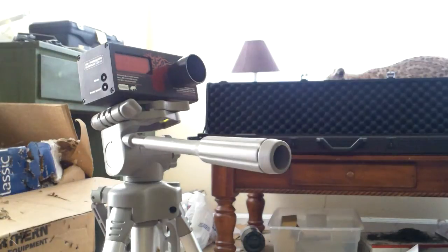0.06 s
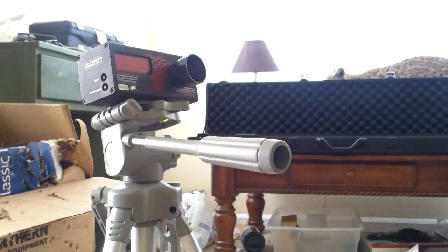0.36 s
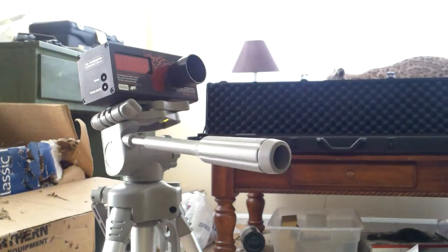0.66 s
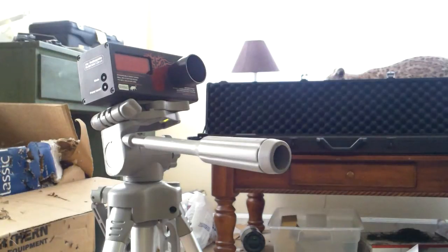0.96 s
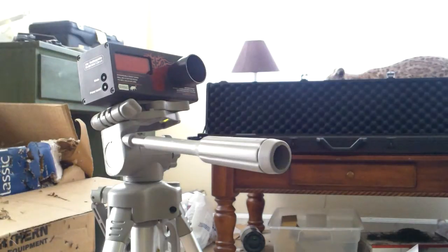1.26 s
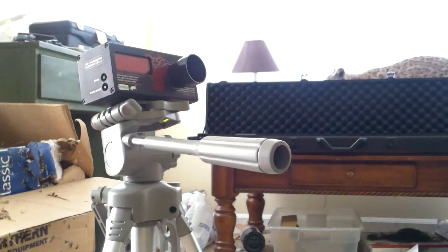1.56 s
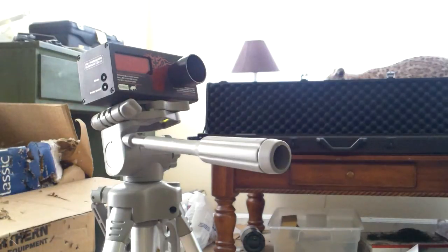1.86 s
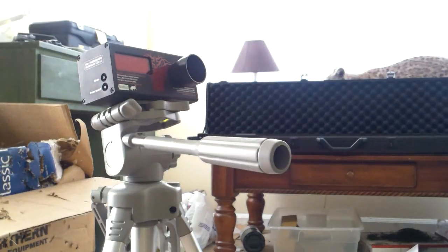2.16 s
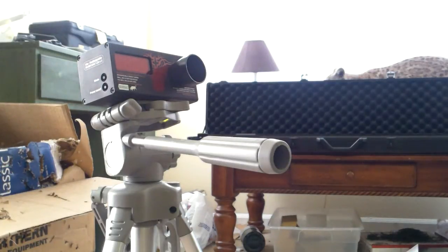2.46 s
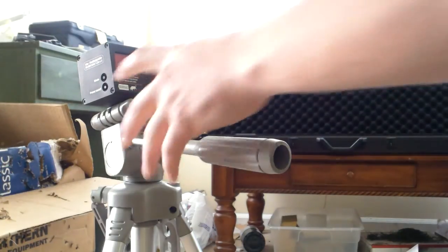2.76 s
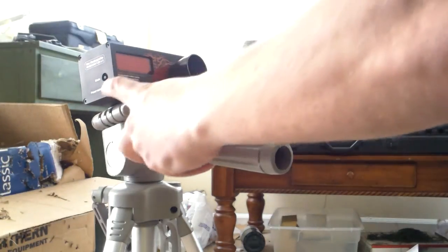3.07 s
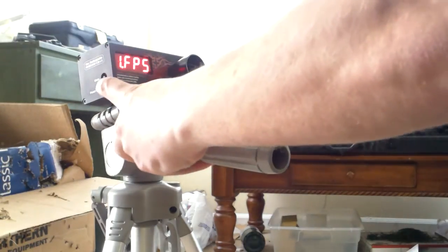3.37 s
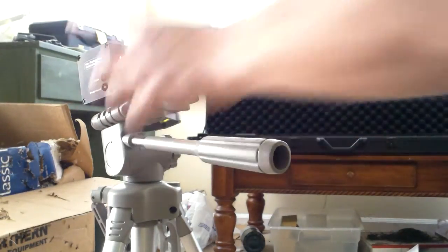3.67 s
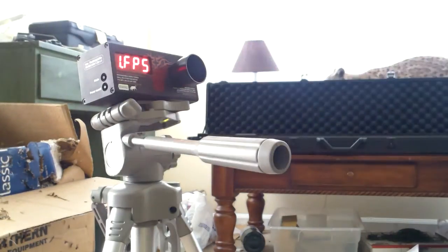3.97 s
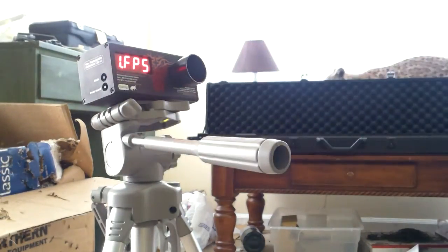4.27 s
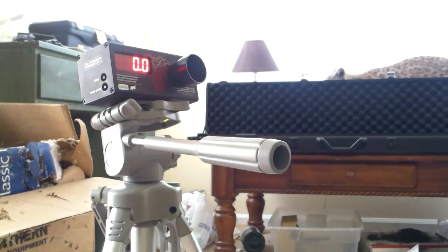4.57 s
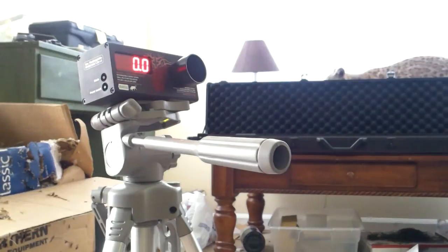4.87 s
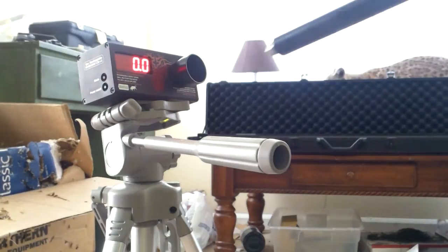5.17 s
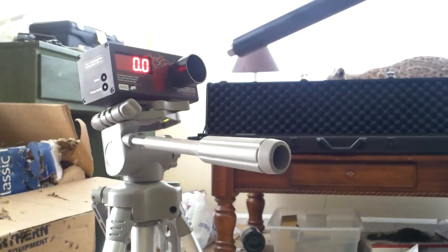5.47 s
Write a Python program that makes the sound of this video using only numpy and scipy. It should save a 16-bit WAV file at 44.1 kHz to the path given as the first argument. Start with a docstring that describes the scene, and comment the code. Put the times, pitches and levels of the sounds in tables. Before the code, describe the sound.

In a small furnished room, an airsoft rifle is loaded with sharp metallic snaps and a brief spring ping. The stock creaks softly, then the bolt clacks back and locks shut. Afterwards come faint sleeve rustles, a small button click and a few hollow plastic knocks as the rifle is lifted. The microphone is close, with a faint hum and low rumble underneath.

```python
"""Airsoft rifle, loaded and cocked.

In a small furnished room, parts snap home, a spring pings, the stock creaks, the bolt slides and locks.
Sleeves rustle, a button clicks and the hollow plastic stock knocks as the rifle is lifted.
Underneath: mains hum, a thin electronic whine, floor rumble. Gain control ducks after the hardest snaps."""
import sys
import numpy as np
from scipy import signal
from scipy.fft import rfft, irfft
from scipy.io import wavfile
from scipy.ndimage import uniform_filter1d

SR = 44100
rng = np.random.default_rng(int(sys.argv[2]) if len(sys.argv) > 2 else 0)


def log_audio(samples):
    """Write samples as a 16-bit WAV file to the path given in sys.argv[1]."""
    # one column per channel
    frames = np.atleast_2d(samples).T
    # limit to full scale, then quantise
    limited = np.clip(frames, -1, 1)
    pcm = np.round(limited * 32767).astype(np.int16)
    wavfile.write(sys.argv[1], SR, pcm)


N = 251811
TIME_S = np.arange(N) / SR

# mains and motor tones: pitch_hz, rms_db, wander_ratio
HUM_TONES = [(120.1, -55, 0.0079), (222.6, -64, 0.0077)]
# noise spectra: freq_hz, relative_db
FLOOR_SPECTRUM = [(20, -11), (40, -5.5), (65, -2), (100, -2), (140, -15), (300, -23.5), (1000, -53)]
AIR_SPECTRUM = [(10, -10.5), (25, 4.5), (38, -1.5), (65, -3.5), (105, -4.5), (145, -16), (200, -16.5),
                (290, -15.5), (450, -16), (1000, -26), (2000, -29.5), (5000, -32.5), (10500, -34.5),
                (16000, -39.5)]
CLOTH_SPECTRUM = [(200, 7.5), (600, 5), (1500, -3), (3000, -6), (6000, -8), (8500, -8), (10500, -13),
                  (13000, -12), (16000, -14)]
HISS_SPECTRUM = [(100, -2.5), (1000, 5.5), (4000, -0.5), (9000, -4.5), (16000, -3)]
# metal contacts in the action: start_s, level_db, chatter_ms, size_cm, contact_us
METAL_CONTACTS = [ (.2233, -1, 8.5, 74, 123), (.2361, 21.5, 1.6, 23, 90), (.2927, 11, 3, 25, 160),
                  (.3066, 16.5, 0.51, 1.8, 31), (.5185, -8, 2.6, 20, 470), (1.0473, 0, 3.4, 2.86, 29),
                  (1.1924, 7.5, 2.2, 4.1, 78), (1.2152, -4, 7.5, 16, 24), (1.2234, -1, 11, 32, 180),
                  (1.2317, 16.5, 3.6, 5.1, 57), (1.2340, 16, 0.59, 9.4, 150), (1.5942, 7, 2, 4.2, 166),
                  (1.6076, 4, 4.4, 4.8, 45), (1.6210, 11, 7.6, 12.7, 76), (1.6280, 6, 3.2, 16, 30),
                  (1.6430, 3.5, 17, 40, 25), (1.6574, 19.5, 2.2, 3, 44)]
# taps on hollow plastic: start_s, level_db, chatter_ms, size_cm, contact_us
PLASTIC_TAPS = [ (1.953, -22, 11, 12, 300), (2.546, -16.5, 1.2, 22, 153), (3.059, -14.5, 2.9, 11, 280),
                (3.434, -15, 1.2, 3.9, 22), (4.014, -15, 1.5, 7.5, 102), (4.050, -15.5, 16, 44, 320),
                (4.160, -9.5, 4.5, 29, 203), (4.197, -12, 1.1, 7.3, 115), (4.352, -9, 4, 22, 380),
                (4.360, -3, 4.6, 47, 88), (4.3622, -2, 0.96, 29, 71), (4.653, -10.5, 6, 25, 260)]
# contact colour: freq_hz, gain_db
METAL_COLOUR = [(150, 5.5), (300, -4.5), (500, -6), (800, 4), (1150, 2.5), (1500, 1), (1900, 6),
                (2600, 4.5), (3300, 2), (4200, 4.5), (5300, 0), (6500, 2.5), (8700, -1), (12500, -1.5),
                (15500, -2.5)]
PLASTIC_COLOUR = [(200, -9), (500, -1), (800, 9), (1150, -1), (1800, 5.5), (3000, 4.5), (4000, 1.5),
                  (6000, 3.5), (8700, -4.5), (10500, -3.5), (15500, -9)]
# ringing modes: pitch_hz, gain_db, t60_s
RECEIVER_MODES = [(1720, -62, 0.073), (1897, -76, .45), (4200, -64, 0.19), (4650, -40, 0.044)]
SHELL_MODES = [(874, -59, 0.041), (1800, -56, 0.074), (2970, -38, .03)]
SEAR_MODES = [(4170, -19.5, 0.35)]
BARREL_MODES = [(654, -23.5, 0.05), (901, -14, 0.14), (1870, -40, 0.93), (6200, -2, 0.028)]
# crowded spring modes: centre_hz, spread_hz, gain_db, t60_s
MAIN_SPRING_BANDS = [(5500, 1700, -51.5, 0.37), (10420, 780, -39.5, 0.14)]
CATCH_SPRING_BANDS = [(5940, 64.3, -10, .08), (6600, 130, 0.5, 0.052), (9540, 75, -8, 0.1),
                      (11900, 350, 2, .04)]
# arm movements brushing the sleeves: peak_s, length_s, level_db
ARM_STROKES = [(2.174, 0.17, -60.5), (2.476, 0.22, -54.5), (2.68, 0.28, -60), (3.746, 0.14, -58.5),
               (4.382, 0.25, -58), (4.663, 0.14, -54), (4.968, 0.25, -61.5)]
# room decay: freq_hz, t60_s
ROOM_DECAY = [(200, 0.4), (800, 0.31), (2500, 0.34), (6000, 0.29), (10000, 0.24), (15000, 0.17)]


def from_db(db):
    """Decibels to gain."""
    return 10 ** (np.asarray(db) / 20)


def unit_rms(x):
    """Scale to rms 1."""
    return x / np.sqrt(np.mean(x ** 2) + 1e-20)


def at_hz(points, hz):
    """Interpolate a spectrum over log frequency."""
    points = np.array(points)
    return np.interp(np.log(np.maximum(hz, 1)), np.log(points[:, 0]), points[:, 1])


def noise(spectrum):
    """Steady coloured noise, rms 1."""
    hz = np.arange(N // 2 + 1) * SR / N
    return unit_rms(irfft(rfft(rng.standard_normal(N)) * from_db(at_hz(spectrum, hz)), N))


def drift(rate_hz):
    """Slow random wander, rms 1."""
    hz = np.arange(N // 2 + 1) * SR / N
    return unit_rms(irfft(rfft(rng.standard_normal(N)) / (1 + (hz / rate_hz) ** 4), N))


def minimum_phase(gain):
    """Causal response with these gains: nothing sounds before the blow."""
    cepstrum = irfft(np.log(gain))
    half = len(cepstrum) // 2
    cepstrum[1:half] *= 2
    cepstrum[half + 1:] = 0
    return np.exp(rfft(cepstrum))


def hum(wander_hz=5):
    """Mains hum and a motor tone, each wavering in pitch."""
    out = np.zeros(N)
    for pitch_hz, rms_db, wander_ratio in HUM_TONES:
        hz = pitch_hz * (1 + wander_ratio * drift(wander_hz))
        out += from_db(rms_db) * np.sqrt(2) * np.sin(2 * np.pi * np.cumsum(hz) / SR)
    return out


def whine(pitch_hz=8572.5, flip_hz=35, level_db=-68):
    """Electronic tone, split into close lines by regular polarity flips."""
    polarity = np.tanh(4 * np.sin(2 * np.pi * flip_hz * TIME_S))
    return from_db(level_db) * np.sqrt(2) * polarity * np.sin(2 * np.pi * pitch_hz * TIME_S)


def floor(peak_s=2.02, peak_db=-51, swell_db_per_s=0.5, settle_db_per_s=3.5):
    """Floorboard rumble: swells as weight shifts, then settles."""
    below_peak_db = np.maximum(swell_db_per_s * (peak_s - TIME_S), settle_db_per_s * (TIME_S - peak_s))
    return from_db(peak_db - below_peak_db) * noise(FLOOR_SPECTRUM)


def contacts(events, colour, first_touch, bass_order, size=4096, sound_m_per_s=343):
    """One sharp touch per event, then a dying chatter of tiny collisions."""
    ms = 1000 * np.arange(size) / SR
    hz = np.arange(1, size // 2 + 2) * SR / size
    fade = np.cos(np.linspace(0, np.pi / 2, size))
    out = np.zeros(N)
    for start_s, level_db, chatter_ms, size_cm, contact_us in events:
        chatter = rng.standard_normal(size) * rng.exponential(1, size) ** .5 * np.exp(-ms / chatter_ms)
        chatter[0] += first_touch
        spectrum = rfft(chatter)
        # divided out below: fine peaks stay random, the part sets the broad colour
        broad = np.sqrt(uniform_filter1d(np.abs(spectrum) ** 2, size=100) + 1e-12)
        low_hz = sound_m_per_s / (2 * size_cm / 100)   # small parts radiate no bass
        high_hz = 1e6 / (2 * contact_us)   # long contacts make no treble
        passband = ((1 + (low_hz / hz) ** (2 * bass_order)) * (1 + (hz / high_hz) ** 4)) ** -.5
        gain = passband * from_db(level_db + at_hz(colour, hz)) / broad
        start = round(start_s * SR)
        out[start:start + size] += fade * irfft(spectrum * minimum_phase(gain))
    return out


def impulse(start_s, level_db):
    """One clean strike."""
    out = np.zeros(N)
    out[round(start_s * SR)] = from_db(level_db)
    return out


def ring(x, modes):
    """Each mode answers a strike with a dying sine."""
    out = np.zeros(N)
    for pitch_hz, gain_db, t60_s in modes:
        r, w = from_db(-60 / (t60_s * SR)), 2 * np.pi * pitch_hz / SR
        mode = signal.lfilter([0, np.sin(w)], [1, -2 * r * np.cos(w), r * r], x + 1e-18)
        out += from_db(gain_db) * mode
    return out


def spring(x, bands, size=12000):
    """Crowded modes beat together: each group rings as a dying noise band."""
    t, hz = np.arange(size) / SR, np.arange(size // 2 + 1) * SR / size
    response = np.zeros(size)
    for centre_hz, spread_hz, gain_db, t60_s in bands:
        bell = np.exp(-.5 * ((hz - centre_hz) / spread_hz) ** 2)
        band = irfft(rfft(rng.standard_normal(size)) * bell, size)
        decay = from_db(-60 * t / t60_s)
        response += from_db(gain_db) * unit_rms(band * decay) * np.sqrt(np.mean(decay ** 2) / 2)
    return signal.fftconvolve(x, response)[:N]


def rifle_action(lock_jolt_db=28.5):
    """Metal contacts shake receiver and main spring; catch spring, sear and barrel are struck once."""
    blows = contacts(METAL_CONTACTS, METAL_COLOUR, first_touch=1.96, bass_order=1)
    catch_drop = impulse(start_s=.3072, level_db=-10)
    sear_catch = impulse(start_s=1.232, level_db=-16)
    bolt_lock = impulse(start_s=1.6577, level_db=-10)
    main_spring = spring(blows + from_db(lock_jolt_db) * bolt_lock, MAIN_SPRING_BANDS)
    ping = spring(catch_drop, CATCH_SPRING_BANDS)
    body = blows + ring(blows, RECEIVER_MODES) + main_spring
    return body + ping + ring(sear_catch, SEAR_MODES) + ring(bolt_lock, BARREL_MODES)


def creak(start_s=0.69, end_s=1, level_db=-33.5, uneven_db=3, count=8):
    """Contact rows for tiny slips in the stock as the grip tightens."""
    chatter_ms, size_cm, contact_us = 0.5, 25, 248.5
    slot_s = (end_s - start_s) / count
    slips = []
    for slot, (offset, force) in enumerate(rng.random((count, 2))):
        slip_s = start_s + (slot + offset) * slot_s
        slip_db = level_db + uneven_db * (2 * force - 1)
        slips.append((slip_s, slip_db, chatter_ms, size_cm, contact_us))
    return slips


def plastic_stock():
    """Slips and taps ring the hollow shell; thin panels lose bass steeply."""
    taps = contacts(list(PLASTIC_TAPS) + creak(), PLASTIC_COLOUR, first_touch=0.85, bass_order=2)
    return taps + ring(taps, SHELL_MODES)


def sleeves(fidget_db=-66, rise_share=0.4, uneven_db=1.0, catch_hz=30):
    """Cloth slides with small catches; each arm stroke swells fast and eases off."""
    power = from_db(fidget_db) ** 2
    for peak_s, length_s, level_db in ARM_STROKES:
        width_s = length_s * np.where(TIME_S < peak_s, rise_share, 1 - rise_share)
        power = power + from_db(level_db) ** 2 * np.exp(-((TIME_S - peak_s) / width_s) ** 2)
    return np.sqrt(power) * from_db(uneven_db * drift(catch_hz)) * noise(CLOTH_SPECTRUM)


def room(x, near_db=-35, walls_db=-35.5, walls_s=.0105, bounce_db=-28, bounce_s=0.007, size=26000):
    """Furniture scatters at once, walls and ceiling bounce together, the tail dies band by band."""
    t, hz = np.arange(size) / SR, np.arange(size // 2 + 1) * SR / size
    white = rfft(rng.standard_normal(size))
    centres_hz, decays_s = zip(*ROOM_DECAY)
    tail = np.zeros(size)
    for share, t60_s in zip(np.eye(len(centres_hz)), decays_s):
        band = irfft(white * at_hz(list(zip(centres_hz, share)), hz), size)
        tail += band * from_db(-60 * t / t60_s)
    far = from_db(walls_db) + from_db(bounce_db) * np.exp(-np.abs(t - walls_s) / bounce_s)
    response = 1 + rfft(tail * np.where(t < walls_s, from_db(near_db), far))
    # soften peaks in the random tail so no single pitch rings out
    power = np.abs(response) ** 2
    even = np.sqrt(uniform_filter1d(power, size=1500) / uniform_filter1d(power, size=110))
    return signal.fftconvolve(x, irfft(response * minimum_phase(even)))[:N]


def microphone(x, port_hz=10450, width_hz=1000, port_db=7.5):
    """The sound port resonates in the high treble."""
    port = signal.iirpeak(port_hz, port_hz / width_hz, fs=SR)
    return x + from_db(port_db) * signal.lfilter(*port, x)


def gain_control(x, limit_db=-23, hold_s=0.45, release_db_per_s=60, attack_s=0.003, hop=32):
    """Midrange over the limit pulls the gain down; it holds, then recovers."""
    midrange = signal.sosfilt(signal.butter(2, [900, 3600], "band", fs=SR, output="sos"), x)
    level_db = 10 * np.log10(np.abs(uniform_filter1d(midrange ** 2, size=220)) + 1e-12)
    cut_db, held_until_s, cuts_db = 0, 0, []
    for now_s, over_db in zip(TIME_S[::hop], level_db[::hop] - limit_db):
        if over_db > cut_db + 1:
            cut_db, held_until_s = over_db, now_s + hold_s
        elif now_s > held_until_s:
            cut_db = max(0, cut_db - release_db_per_s * hop / SR)
        cuts_db.append(cut_db)
    pole = np.exp(-1 / (attack_s * SR))
    smooth_db = signal.lfilter([1 - pole], [1, -pole], np.interp(TIME_S, TIME_S[::hop], cuts_db))
    return x * from_db(-smooth_db)


def scene(air_db=-52):
    """Rifle in the room and dry sleeves, over the background."""
    handling = microphone(room(rifle_action() + plastic_stock()) + sleeves())
    return (handling + floor() + hum() + whine() + from_db(air_db) * noise(AIR_SPECTRUM))[None]


def record(dry, hiss_db=-65.5, ceiling=0.6, cutoff_hz=15900):
    """Gain control, hiss, soft clip, treble cut."""
    x = gain_control(dry[0]) + from_db(hiss_db) * noise(HISS_SPECTRUM)
    lowpass = signal.ellip(10, .2, 80, cutoff_hz, fs=SR, output="sos")
    return signal.sosfilt(lowpass, ceiling * np.tanh(x / ceiling))[None]


dry = scene()
out = record(dry)
log_audio(out)
```